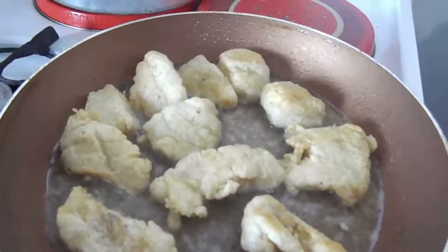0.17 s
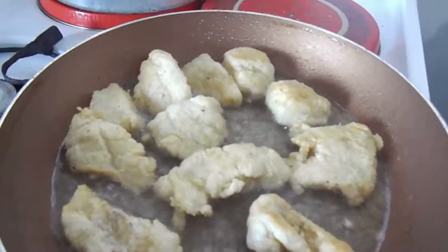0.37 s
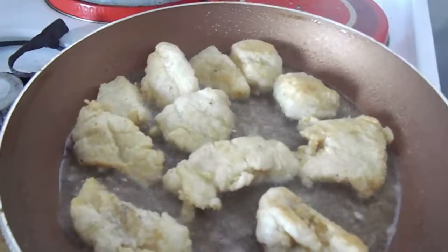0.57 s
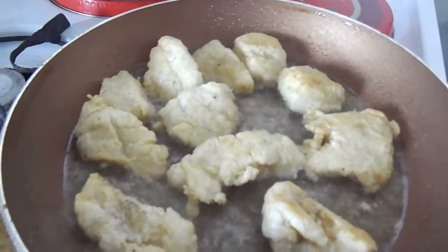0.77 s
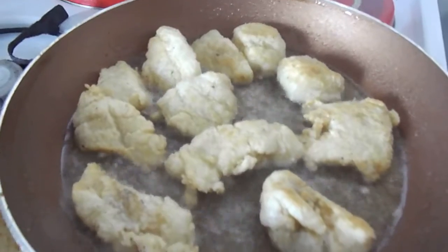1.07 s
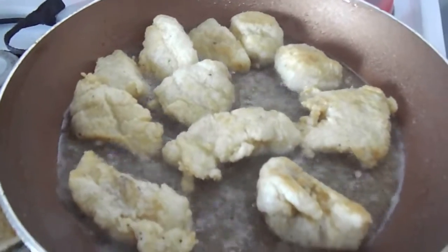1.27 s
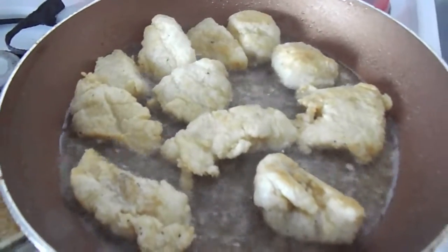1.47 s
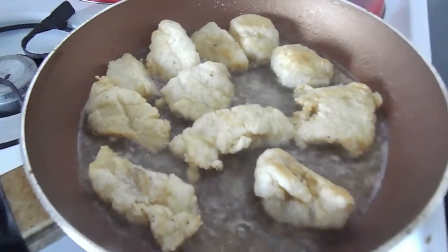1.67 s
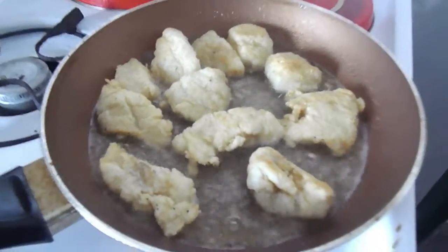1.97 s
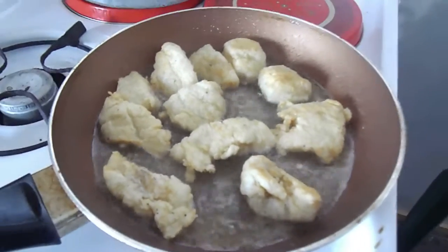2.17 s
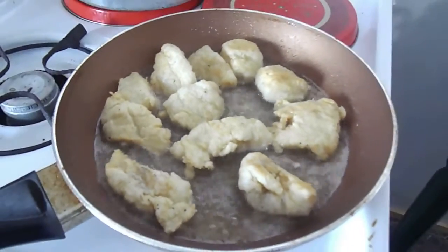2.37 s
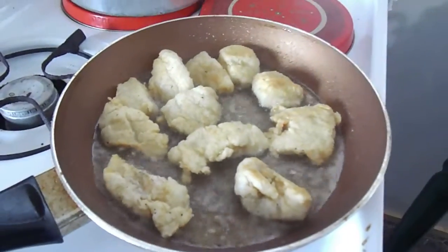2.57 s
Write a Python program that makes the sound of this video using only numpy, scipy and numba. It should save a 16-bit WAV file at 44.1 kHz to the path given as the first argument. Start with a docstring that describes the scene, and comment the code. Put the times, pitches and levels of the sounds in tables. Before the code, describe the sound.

Close mono sound of hot oil sizzling around battered pieces in a pan; the fizz runs steadily throughout while crisp ticks and larger bubble pops jump out irregularly, over a very faint low kitchen hum.

```python
"""Battered fish fries in shallow oil, close to one microphone in a kitchen.
The sizzle is thousands of steam bubbles a second, each a short ring of a few cycles.
Sharp crackles (single clicks) and a fine hiss (plain noise) mix in, and larger bubbles pop out of the sizzle.
A faint low room tone, made of filtered noise, lies below."""
import sys
import numpy as np
from scipy import signal
from scipy.fft import rfft, irfft
from scipy.io import wavfile
from scipy.ndimage import uniform_filter1d
from numba import njit

SR = 44100
rng = np.random.default_rng(int(sys.argv[2]) if len(sys.argv) > 2 else 0)


def unload_audio(sound):
    """Save the sound as a 16-bit wav file, at the path given as the first command line argument."""
    columns = np.transpose(np.atleast_2d(sound))
    # keep every value between -1 and 1, then stretch to whole-number steps
    steps = np.round(np.clip(columns, -1, 1) * 32767)
    wavfile.write(sys.argv[1], SR, steps.astype(np.int16))


N = 119952  # length in samples

# Room tone, loudness over pitch: pitch_hz, level_db (per Hz)
ROOM_TONE = [(15, -45), (25, -18), (108, -2.5), (151, 3.5), (306, -17), (356, 2.5), (400, -9.5), (520, -41),
             (880, -120)]
# Faint low resonances of the pan: pitch_hz, width_hz, level_db
PAN_RESONANCES = [(165.3, 6.3, -70), (369, 21, -61), (502.4, 6.1, -60.5), (753, 33, -56.5),
                  (1243, 80, -60.5)]
# Colour of pan, oil and microphone: pitch_hz, level_db (per Hz)
PAN_COLOUR = [(120, -38.5), (200, -21), (310, -19.5), (372, -15.5), (430, -17), (576, -15.5), (771, -12),
              (1030, -10), (1380, -9.5), (1660, -3), (2030, -2.5), (2300, -6.5), (2660, -0.5), (2970, -3),
              (5230, -5.5), (6200, -5), (6600, -3), (7900, -4), (8600, -4.5), (11000, -6), (14800, -6.5),
              (15700, -7)]
# Loudest bursting bubbles: peak_s, level_db (of the ring alone), pitch_hz (at the peak)
LOUD_POPS = [(0.1553, -22, 1660), (0.1989, -11, 13000), (0.2065, -21, 2570), (0.2069, -27, 1280),
             (0.248, -18, 3630), (0.2982, -9, 7260), (0.3, -12, 13000), (0.3043, -22, 1660),
             (0.3043, -8, 8640), (0.3475, -14, 13000), (0.4121, -25, 1400), (0.4323, -18, 3630),
             (0.4769, -23, 1660), (0.5508, -22, 1980), (0.5864, -18, 3330), (0.6098, -11, 13000),
             (0.6226, -13, 11200), (0.6654, -24, 1820), (0.8001, -20, 2160), (0.8294, -14, 13000),
             (0.8615, -20, 2800), (0.8634, -18, 3050), (0.9567, -12, 6660), (1.0349, -10, 9420),
             (1.0958, -11, 8640), (1.0968, -7, 9420), (1.1009, -8, 13000), (1.1057, -10, 13000),
             (1.1095, -8, 9420), (1.1701, -18, 3960), (1.1803, -22, 1820), (1.1886, -12, 13000),
             (1.1906, -10, 12210), (1.241, -22, 2570), (1.2509, -21, 2570), (1.3628, -9, 12210),
             (1.4255, -22, 1980), (1.4359, -13, 13000), (1.4599, -21, 1660), (1.4683, -20, 2350),
             (1.5206, -15, 13000), (1.5301, -18, 3050), (1.5941, -12, 11200), (1.6046, -13, 13000),
             (1.6155, -12, 13000), (1.6268, -12, 7920), (1.6692, -20, 2800), (1.7177, -13, 13000),
             (1.729, -15, 6110), (1.8723, -23, 1980), (1.9354, -11, 7260), (1.9741, -12, 9420),
             (1.9749, -13, 11200), (1.9841, -19, 3050), (2.1057, -13, 8640), (2.1117, -20, 2350),
             (2.1377, -10, 10270), (2.2496, -13, 7260), (2.338, -25, 2160), (2.3738, -12, 13000),
             (2.3966, -20, 3630), (2.4224, -12, 7260), (2.4568, -15, 13000), (2.5229, -15, 2350),
             (2.5351, -15, 13000), (2.5689, -16, 13000), (2.6201, -16, 9420), (2.641, -14, 13000),
             (2.665, -22, 2800)]
# Vigour of the frying: start_s, level_db, brightness_db (added to the treble)
FRYING_VIGOUR = [(.07, -22, -0.5), (.2, -23.5, 0.5), (.35, -24, 0.5), (.5, -23, 1), (.7, -25, 3),
                 (.9, -24.5, 2.5), (1.05, -23.5, 1), (1.12, -23.5, 1), (1.25, -24.5, 3), (1.4, -24, 1.5),
                 (1.55, -23.5, -.5), (1.65, -25, 1.5), (1.85, -26, 3), (1.98, -23, 0), (2.05, -27, 2),
                 (2.25, -26, 2), (2.45, -25, 1.5), (2.72, -25, -0.5)]

START_S = .0724  # the sound begins here
TOP_HZ = 15720  # the recorder cuts everything above
ROOM_DB, WAVER_DB = -66, 4  # room tone level; wavering of the resonances
FLICKER_DB = .45  # quick unsteadiness of the sizzle

# Mix of the sizzle, before the pan colours it
FIZZ_DB, CRACKLE_DB, HISS_DB = -8.5, -6, -9
# Average extra strength of a random bubble or tick; the cap is in multiples of it
FIZZ_SPREAD_DB, CRACKLE_SPREAD_DB, SIZE_CAP = 1.5, 2.5, 3.6

# Swell time in cycles for a 2500 Hz bubble; pitch rise as a fraction per cycle
FIZZ_CYCLES, FIZZ_GLIDE = 1.52, .0413
POP_CYCLES, POP_GLIDE = 1.4, .04
CYCLES_FALL = .22  # small, high bubbles ring fewer cycles: power of pitch

POP_TAIL_DB, POP_TAIL_S = -8, .002  # scattered tail of a pop: level and fade time
SPUTTER_DB, SPUTTER_S, SPUTTER_OCTAVES = -10, .006, .35  # smaller bubbles: level, time and pitch scatter


def undb(db):
    """Turn decibels into a plain amplitude factor."""
    return 10 ** (np.asarray(db) / 20)


def level(x, db):
    """Scale a sound to an average (RMS) level in dB."""
    return x * undb(db) / np.sqrt(np.mean(x ** 2))


def colour(x, table):
    """Filter a sound to follow a pitch_hz, level_db table, reacting only after each input (minimum phase)."""
    hz, db = np.array(table).T
    grid_hz = np.fft.rfftfreq(4096, 1 / SR)
    gain = undb(np.interp(np.log(grid_hz + 1), np.log(hz), db))
    # Fold the cepstrum (spectrum of the log gain) forward, so that nothing sounds early
    cepstrum = irfft(np.log(gain))
    cepstrum[1:2048] *= 2
    cepstrum[2049:] = 0
    response = irfft(np.exp(rfft(cepstrum)))
    return signal.fftconvolve(x, response)[:N]


def walk(rate):
    """Random wandering curve: `rate` new values a second, smoothed twice; spread near 1."""
    hold = int(SR / rate)
    steps = np.repeat(rng.standard_normal(N // hold + 1), hold)
    smooth = uniform_filter1d(uniform_filter1d(steps, hold), hold)
    return 1.3 * smooth[:N]  # smoothing shrinks the spread


def sizes(count, spread_db):
    """Random strengths: many weak, few strong."""
    return undb(spread_db * np.minimum(rng.exponential(size=count), SIZE_CAP))


def ring_cycles(cycles, hz):
    """Smaller bubbles have higher pitch and ring for fewer cycles."""
    return cycles * (hz / 2500) ** -CYCLES_FALL


@njit
def rings(at, hz, size, phase, cycles, glide):
    """Each bubble swells for `cycles`, peaks at `at` (samples), dies away and rises in pitch."""
    out = np.zeros(N)
    for k in range(len(at)):
        tau = cycles[k] * SR / hz[k]  # swell time in samples
        first = int(at[k] - tau) + 1
        for i in range(max(first, 0), min(first + int(7 * tau), N)):
            u = (i - at[k]) / tau + 1  # 0 at the start, 1 at the peak
            c = cycles[k] * (u - 1)  # cycles counted from the peak
            envelope = u * np.exp(1 - u)
            angle = phase[k] + 2 * np.pi * c * (1 + glide * c / 2)
            out[i] += size[k] * envelope * np.sin(angle)
    return out


def room():
    """Low room tone from shaped noise, plus narrow resonances of the pan that waver in level."""
    x = level(colour(rng.standard_normal(N), ROOM_TONE), ROOM_DB)
    for hz, width_hz, db in PAN_RESONANCES:
        waver = undb(WAVER_DB * walk(6.05))
        b, a = signal.iirpeak(hz, hz / width_hz, SR)
        tone = signal.lfilter(b, a, rng.standard_normal(N))
        x = x + level(waver * tone, db)
    return x


def hiss():
    """Bubbles too fine and many to tell apart add up to plain noise."""
    return level(rng.standard_normal(N), HISS_DB)


def crackle(count):
    """Spitting oil gives sharp ticks: one-sample clicks that hold every pitch."""
    x = np.zeros(N)
    when = rng.integers(0, N, count)
    ticks = rng.choice([-1, 1], count) * sizes(count, CRACKLE_SPREAD_DB)
    np.add.at(x, when, ticks)
    return level(x, CRACKLE_DB)


def pops(count):
    """Larger bubbles ring amid `count` smaller ones each, with a short scattered tail from the pan."""
    t, db, hz = np.array(LOUD_POPS, float).T[:, :, None]
    scatter = rng.standard_normal((len(t), 3, count))
    sputter_t = t + SPUTTER_S * scatter[:, 0]
    sputter_db = db + SPUTTER_DB - 3 * np.abs(scatter[:, 1])
    sputter_hz = np.minimum(hz * 2 ** (SPUTTER_OCTAVES * scatter[:, 2]), 16000)
    t = np.hstack([t, sputter_t]).ravel()
    db = np.hstack([db, sputter_db]).ravel()
    hz = np.hstack([hz, sputter_hz]).ravel()
    phase = 2 * np.pi * rng.random(len(t))
    x = rings(t * SR, hz, undb(db), phase, ring_cycles(POP_CYCLES, hz), 1. * POP_GLIDE)
    tail = rng.standard_normal(1500) * np.exp(-np.arange(1500) / SR / POP_TAIL_S)
    tail = tail / np.linalg.norm(tail)
    x = x + undb(POP_TAIL_DB) * signal.fftconvolve(x, tail)[:N]
    # Bubbles radiate no bass
    return signal.sosfilt(signal.butter(3, 600, "high", fs=SR, output="sos"), x)


def fizz(count):
    """Swarm of small steam bubbles of every size, each ringing at its own pitch."""
    when, pitch, turn = rng.random((count, 3)).T
    hz = 250 + 16500 * pitch ** 1.291
    size = hz ** 0.78 * sizes(count, FIZZ_SPREAD_DB)
    x = rings(when * N, hz, size, 2 * np.pi * turn, ring_cycles(FIZZ_CYCLES, hz), 1. * FIZZ_GLIDE)
    return level(x, FIZZ_DB)


def sizzle():
    """Fizz, crackle and hiss share the pan's colour; level and treble follow the vigour of the frying."""
    t = np.arange(N) / SR
    at, db, bright_db = np.array(FRYING_VIGOUR, float).T
    oil = level(colour(fizz(count=11000) + crackle(count=6000) + hiss(), PAN_COLOUR), 0)
    # Split near 4500 Hz, so that the two parts flicker separately
    low = signal.sosfilt(signal.butter(2, 4500, fs=SR, output="sos"), oil)
    treble = oil - low
    low_gain = undb(FLICKER_DB * walk(30.))
    treble_gain = undb(np.interp(t, at, bright_db) + FLICKER_DB * walk(30.))
    oil = low * low_gain + treble * treble_gain
    return oil * undb(np.interp(t, at, db))


def scene():
    """Add the sizzle, pops and room; all begin together after a short silence."""
    t = np.arange(N) / SR
    start = np.clip((t - START_S) / .0003, 0, 1)  # opens within 0.3 ms
    mix = sizzle() + pops(count=4) + room()
    return (mix * start)[None]


def record(dry):
    """The recorder cuts the top steeply."""
    return signal.sosfilt(signal.ellip(16, .3, 80, TOP_HZ, fs=SR, output="sos"), dry)


dry = scene()
out = record(dry)
unload_audio(out)
```